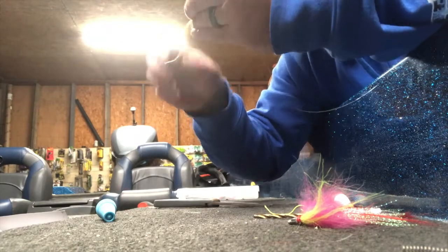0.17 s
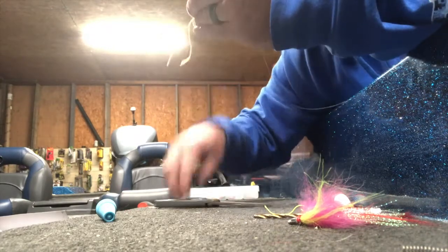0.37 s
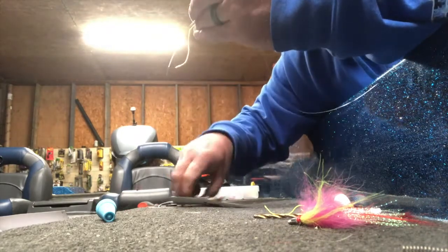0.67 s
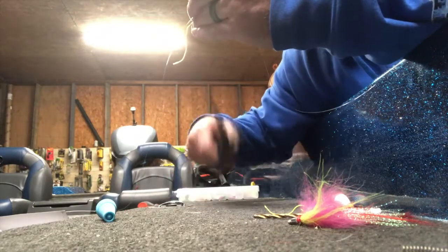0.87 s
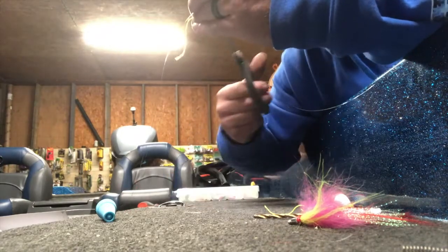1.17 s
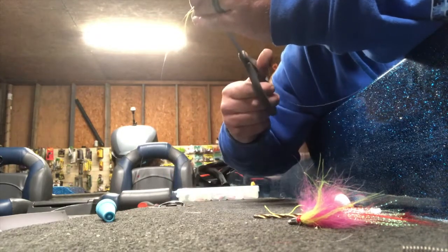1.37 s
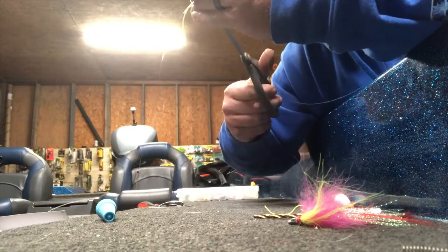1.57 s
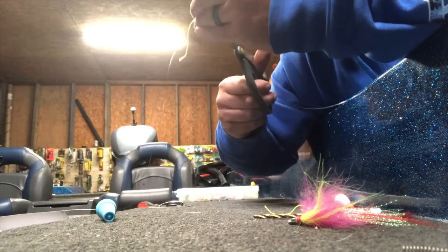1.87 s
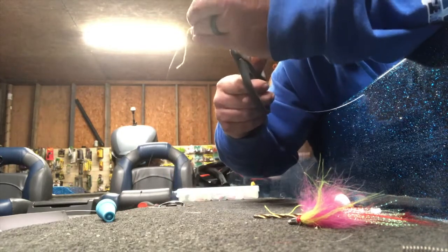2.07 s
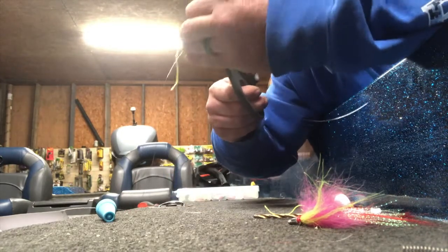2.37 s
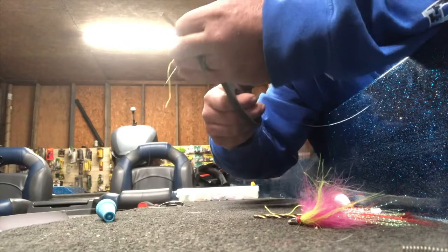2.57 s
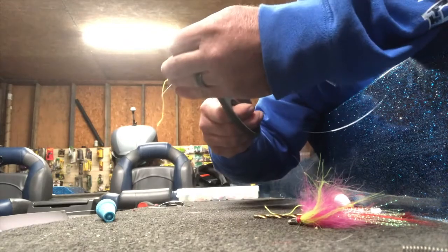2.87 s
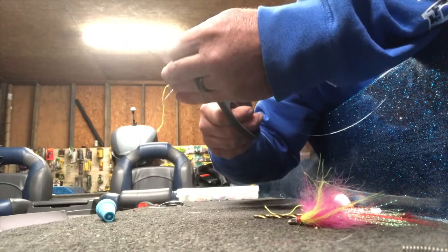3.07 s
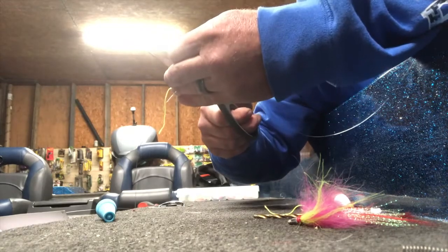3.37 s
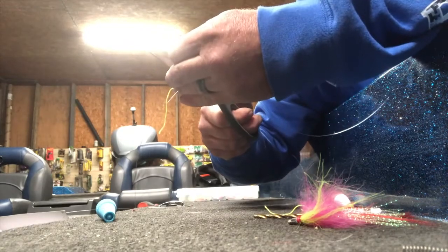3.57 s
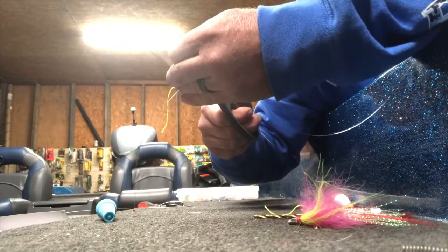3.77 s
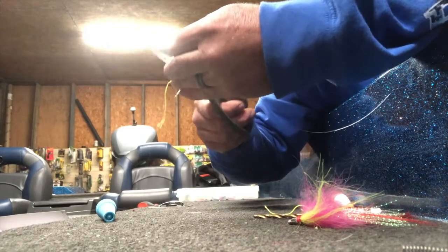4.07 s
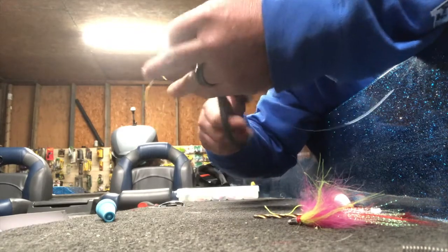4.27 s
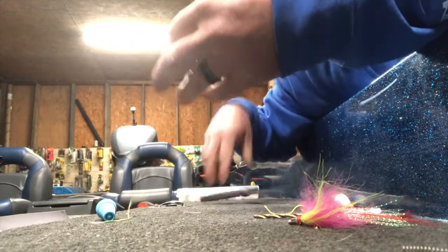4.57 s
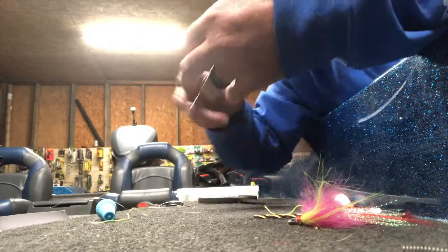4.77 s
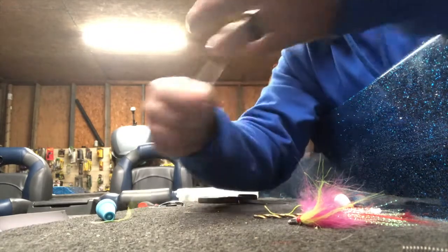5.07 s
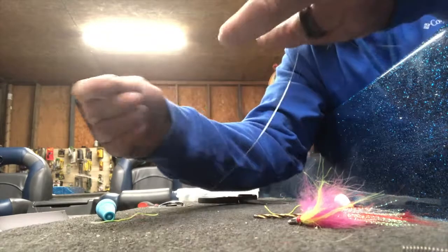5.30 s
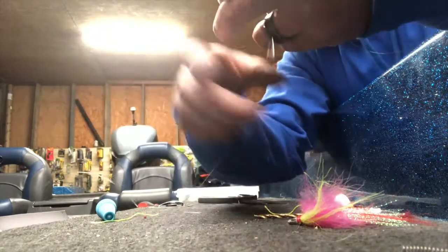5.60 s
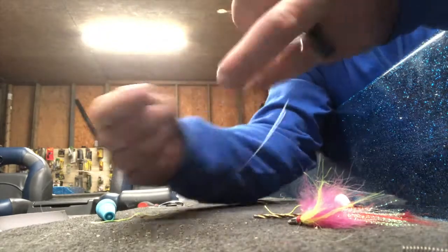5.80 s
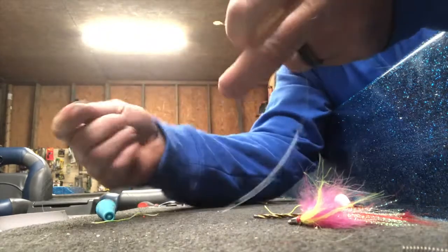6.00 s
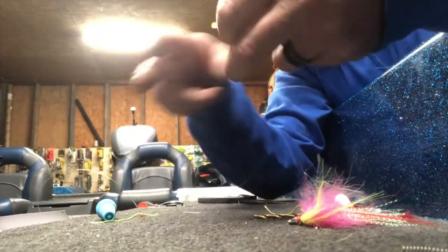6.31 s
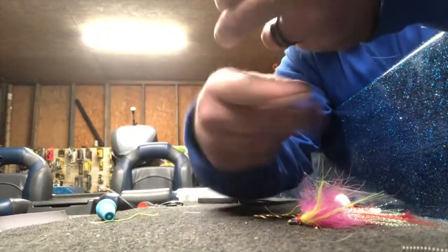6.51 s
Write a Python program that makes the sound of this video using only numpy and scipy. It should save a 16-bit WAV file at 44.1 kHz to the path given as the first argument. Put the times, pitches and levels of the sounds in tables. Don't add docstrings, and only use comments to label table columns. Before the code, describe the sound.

A low, slightly wavering garage hum and soft hiss run throughout, heard from a microphone lying on a carpeted boat deck. At about 0.43 s a hand strikes steel pliers: a hard, dull clack with a woody thump. From 0.5 to 0.7 s they scrape over carpet with a rough rasp and a quickening little rattle, ending in a brighter double clack at 0.72 s and a fading swish. Light sleeve rustles and a thin squeak follow around 1.1 s, then near quiet, with barely audible taps past 3 s. Two tiny crisp snips come at 3.88 and 3.91 s, then a faint falling whisk of line at 4.2 s. At 4.54-4.6 s the pliers drop loudly on a hollow lid, steel jaws chattering, with a softer bounce at 4.7 s and short room echo. Cloth rustle and faint squeaks continue to 6.6 s, with small taps near 5.9 and 6.59 s.

```python
import sys
import numpy as np
from scipy import signal
from scipy.fft import rfft, irfft
from scipy.io import wavfile
from scipy.ndimage import uniform_filter1d

SR = 44100
rng = np.random.default_rng(int(sys.argv[2]) if len(sys.argv) > 2 else 0)


def master_out(mix):
    frames = np.transpose(np.atleast_2d(mix))
    ceiling = np.clip(frames, -1, 1)
    pcm = np.round(ceiling * 32767).astype(np.int16)
    wavfile.write(sys.argv[1], SR, pcm)


def amplitude_ratio(level_db):
    exponent = np.asarray(level_db, float) / 20
    return 10 ** exponent


N = 293160
TIME = np.arange(N) / SR

# (pitch [Hz], level [dB per Hz])
HUM_COLOUR = [(15, -61), (25, -38.5), (35, -14.5), (49, -4.5), (189, 0.5), (285, -1.5), (565, -8),
              (694, -14), (1120, -22), (1500, -27.5), (1950, -55), (3300, -120)]
# (time [s], level [dB])
HUM_LEVEL = [
    [(0., -63.5), (.25, -67), (1., -69), (2.3, -66), (4.5, -67.5), (4.95, -62.5), (6.14, -66.5),
     (6.5, -63.5)],
]
# (pitch [Hz], level [dB per Hz])
HISS_COLOUR = [(500, -29.5), (900, -5.5), (1250, -5), (1500, -11.5), (2700, -12), (5000, -15),
               (7900, -16.5), (8400, -21), (12000, -22.5), (14900, -23), (15050, -47.5), (16500, -60.5)]
# (time [s], cloth rustle [dB])
ARM = [(0., -91), (.38, -86.5), (.96, -78), (1.35, -85), (1.55, -91), (1.85, -82.5), (2.2, -82.5),
       (2.5, -89), (3.4, -86), (4.1, -91), (4.5, -76), (4.85, -72), (5.15, -73), (5.55, -80.5),
       (6.05, -80.5), (6.35, -75.5), (6.5, -81.5)]
# (time [s], cloth rustle [dB], bright fibre hiss [dB])
FLICKS = [(.226, -89, -77), (1.08, -85.5, -71), (1.18, -85, -73), (1.8, -86, -81), (3.46, -74, -89),
          (3.94, -82, -77), (4.2, -74, -75.5), (5.441, -76, -78), (5.78, -79, -86), (5.95, -68, -93),
          (6.1, -82, -85), (6.581, -70, -85)]
# (pitch [Hz], level [dB per Hz])
CLOTH = [(410, -31.5), (700, -2), (1140, -2.5), (1380, -10.5), (1800, -8), (2730, -14.5), (4380, -11.5),
         (5470, -18.5), (15200, -29), (16000, -28.5)]
# (pitch [Hz], level [dB per Hz])
FIBRE = [(4000, -31), (7000, -3.5), (11000, -3), (14000, -4.5), (16000, -13.5)]
# (pitch [Hz], time to fade by 60 dB [s], level [dB])
GARAGE = [(70, .6, -15), (150, 0.6, -7.5), (500, 0.52, -14), (1500, 0.27, -23), (3457, 0.35, -26.5),
          (6000, 0.42, -17.5), (8924, .35, -28), (13140, .3, -22.5)]
# (time [s], length [s], start pitch [Hz], width [Hz], level [dB])
SQUEAKS = [
    (1.101, 0.047, 11000, 1500, -78),
    (1.578, .15, 3740, 248, -82),
    (4.819, 0.49, 4400, 1166, -88.5),
    (4.852, 0.71, 2200, 299, -84),
    (5.082, 0.22, 4100, 800, -80),
    (5.756, 0.071, 2320, 252, -77.5),
    (6.071, 0.16, 2017, 299.5, -82),
    (6.181, 0.071, 4370, 790, -80.5),
    (6.286, 0.1, 1805, 109, -72.5),
]
# (time [s], length [s], level [dB])
WHIPS = [
    (4.174, 0.0093, -72.5),
    (4.199, .016, -70),
    (4.227, .009, -75),
]
# (time [s], level [dB])
DRAG = [
    [(.485, -45), (.53, -56), (.58, -52), (.59, -43.5), (.645, -42.5), (.68, -41.5), (.712, -47.5)],
]
# (pitch [Hz], level [dB per Hz])
CARPET = [(300, -27), (600, -4.5), (950, -5.5), (1230, 4.5), (1500, -6.5), (2400, -10), (3200, -15),
          (3900, -19), (4300, -27.5), (7000, -35.5), (12000, -45), (16000, -50)]
# (pitch [Hz], level [dB per Hz])
PILE = [(500, -25.5), (1000, -3.5), (2000, -7), (2800, -7.5), (3600, -1.5), (5250, -0.5), (5500, -20),
        (9000, -26.5), (14000, -39.5)]
# (pitch [Hz], level [dB], time to fade by 60 dB [s])
DECK = [(47.79, -6.5, .4), (66.74, -5, 0.52), (82, -9.5, 0.29), (100.4, -1, 0.36), (118.46, -0.5, 0.15),
        (151.4, 2, 0.24), (190, 2.5, 0.098), (220, 4, 0.18), (275, -2, 0.2), (322.3, -15, 0.056),
        (415.3, 0, 0.19), (470, -4, 0.036), (501.5, -3.5, 0.084), (568.6, 3.5, 0.0799), (636.2, 4.5, 0.078),
        (740, -3.5, 0.1185), (820, -5, 0.14), (1010, -4, .04), (1328, 0, 0.098)]
# (time [s], peak [dB], brightest pitch [Hz], ring stretch [times])
THUDS = [(.437, -29.5, 694.6, 0.69), (.44, -29, 70, 0.54), (.445, -29, 293.1, 0.66),
         (.455, -29, 169.6, 0.71), (.476, -40.5, 150, 3.4), (.652, -31, 220, 0.82), (.664, -33, 245, 0.47),
         (.67, -39.5, 80.5, 1.), (.727, -27.5, 547.6, 0.8), (.775, -40.5, 391, 0.53),
         (3.144, -53, 750, 0.23), (3.884, -48.5, 600, 0.25), (3.9155, -48, 620, 0.22),
         (4.541, -18.5, 350, 0.34), (4.563, -14.5, 705, 0.88), (4.572, -21, 345, 0.7),
         (4.575, -30.5, 80, 1.4), (4.584, -16.5, 904, 0.15), (4.702, -28, 500, 0.33),
         (4.707, -27.5, 204, 0.29), (4.71, -36, 108, 0.61), (4.72, -31.5, 294, 0.77),
         (5.891, -45, 280, 0.26)]
# (pitch [Hz], level [dB], time to fade by 60 dB [s])
LID = [(280, -4.5, 0.078), (345, -0.5, 0.033), (475, -1, .05), (538, -0.5, 0.055), (740, -2, 0.028),
       (1010, -2.5, 0.016), (1450, 0, .015)]
# (time [s], peak [dB], brightest pitch [Hz], ring stretch [times])
SLAPS = [
    (.6478, -27, 345, 1.),
    (4.564, -23, 280, 0.86),
    (4.5626, -24, 1450, 0.94),
    (4.5628, -16.5, 1010, 1),
    (4.5632, -17, 740, 0.8),
    (4.5645, -12, 534, 0.85),
    (4.7025, -36, 1010, 0.73),
    (4.705, -26.5, 596, 0.38),
    (4.716, -25.5, 500, 0.7),
]
# (pitch [Hz], level [dB], time to fade by 60 dB [s])
JAWS = [(3980, -7, 0.077), (5100, -11, .03), (5814, -3, 0.0904), (6440, -5.5, .06), (7223, -5.5, 0.0632),
        (8680, -10, .1), (9900, -16.5, .04), (10797, -10, .07), (11400, -8.5, .04), (12230, -22.5, .04),
        (14290, 2, .07), (15103, 0, .07), (14775, 0, .06), (16050, -2, .04)]
# (time [s], length [s], level [dB], treble tilt [dB per octave])
GRIPPED = [(0.232, 0.0023, -73.5, 0.5), (.437, .05, -68, 0), (0.717, .05, -66, 5.5),
           (1.025, 0.009, -73, -1.5), (1.184, .005, -70, 6), (1.354, .002, -73, 3),
           (3.143, .0012, -63.5, -0.5), (3.3, .002, -76, -7), (3.8835, .0016, -55, 2),
           (4.197, 0.0032, -64, 6), (4.234, 0.0028, -68, -6), (4.25, .003, -68, 5), (4.348, .003, -71.5, 4),
           (4.5404, .003, -50.5, -1.5), (5.065, 0.008, -75, 4), (5.888, .0012, -65.5, -5),
           (6.13, .012, -79, 10), (3.9095, .004, -68, 4), (3.9132, .0045, -55.5, 3), (3.924, .012, -74, 5)]
# (time [s], length [s], level [dB], treble tilt [dB per octave])
LOOSE = [
    (4.565, 0.023, -34, -4.5),
    (4.585, 0.012, -48.5, -5),
    (4.595, .11, -54, -2.5),
    (4.704, .017, -46, 0.5),
    (4.718, 0.096, -65, -1.5),
]
# (pitch [Hz], level [dB], time to fade by 60 dB [s])
PRESSED_HANDLE = [(740, -25, .03), (1237, -13, 0.023), (1612, -13.5, 0.03), (2050, -0.5, .011),
                  (2200, -0.5, 0.0078), (2500, -6.5, .01), (2743, -8, 0.0099), (3495, -16, 0.00993),
                  (4400, -26, 0.01208), (5000, -23, .01), (6300, -31.5, 0.0088), (7160, -26, .009),
                  (8700, -40.5, 0.0074), (11000, -47.5, 0.0078), (14030, -51, .008)]
# (time [s], peak [dB], brightest pitch [Hz], ring stretch [times])
PRESSED_KNOCKS = [(.4115, -53.5, 2360, 1.165), (.4236, -53.5, 2200, 1.), (.4305, -44.5, 5000, .8),
                  (.4347, -2.5, 2032, 0.87), (.4375, -23.5, 1300, 1.8), (.448, -11.5, 2500, 0.95),
                  (0.452, -22.5, 1600, 3), (.4555, -17.5, 2598, 0.76), (.461, -20.5, 2300, 1.2),
                  (.464, -18.5, 1540, 1), (.475, -27.5, 1694, 0.63), (.4775, -29, 1251, 0.36)]
# (pitch [Hz], level [dB], time to fade by 60 dB [s])
FREE_HANDLE = [(1224, -4, 0.026), (1570, -3.5, .016), (1940, -7, 0.009), (2425, -0.5, .01),
               (2870, -10.5, 0.014), (3570, -7.5, 0.01), (4400, -16.5, .012), (5000, -15.5, 0.012),
               (6500, -24.5, 0.021), (7150, -22, .009), (8826, -33, 0.0097), (10520, -35.5, .008),
               (12500, -42.5, .008), (14400, -42.5, .008)]
# (time [s], peak [dB], brightest pitch [Hz], ring stretch [times])
FREE_KNOCKS = [(0.54, -42, 2500, 0.42), (.563, -51.5, 3000, .8), (.6475, -32.5, 1500, 0.54),
               (.678, -36.5, 2010, 1.), (.7142, -14.5, 2500, 0.84), (.7227, -8, 3330, 0.82),
               (0.724, -7.5, 2090, 0.48), (0.7257, -13, 1390, 0.9), (.737, -34, 2393, 1.3),
               (.744, -36.5, 5000, 1.2), (.772, -34, 2000, 1.), (4.5385, -41, 2500, .6),
               (4.5401, -17, 3600, 0.45), (4.542, -31, 2990, 0.93), (4.5629, -13.5, 1700, 0.52),
               (4.583, -23.5, 1407, 1.2), (4.7019, -40.5, 1500, .8)]
# (time [s], peak [dB], brightest pitch [Hz])
TAPS = [
    (3.365, -62, 1500),
    (3.465, -66, 2500),
    (3.881, -49.5, 2387),
    (3.9142, -49, 5200),
    (3.9142, -54, 2300),
    (5.891, -54.5, 2500),
    (6.115, -63.5, 2402),
    (6.586, -56, 6500),
]


def curve(table):
    seconds, level = np.transpose(table)
    return np.interp(TIME, seconds, level)


def colour(x, points):
    hz, db = np.transpose(points)
    grid = np.fft.rfftfreq(len(x), 1 / SR) + 1
    gain = amplitude_ratio(np.interp(np.log(grid), np.log(hz), db))
    y = irfft(rfft(x) * gain, len(x))
    return y / np.sqrt(np.mean(y ** 2))


def walk(rate):
    hold = int(SR / rate)
    steps = np.repeat(rng.standard_normal(N // hold + 1), hold)
    return 1.3 * uniform_filter1d(uniform_filter1d(steps, hold), hold)[:N]


def add(out, s, x):
    i = int(s * SR)
    out[i:i + len(x)] += x[:len(out) - i]


def band_noise(count, low_hz, high_hz):
    band = signal.butter(2, [low_hz, high_hz], "bandpass", fs=SR, output="sos")
    return signal.sosfilt(band, rng.standard_normal(count))


def grains(rate, spread_db):
    happens = rng.random(N) < rate / SR
    return happens * rng.standard_normal(N) * amplitude_ratio(spread_db * rng.exponential(size=N))


def ring(modes, gains, stretch, rise, detune):
    hz, db, t60 = np.transpose(modes)[:, :, None]
    t = np.arange(int(SR * stretch * t60.max() * 4 / 5)) / SR
    swell = 1 - np.exp(-(t * hz / rise) ** 2)
    fade = amplitude_ratio(db - 60 * t / (t60 * stretch))
    wave = np.sin(2 * np.pi * hz * detune[:, None] * t) * swell * fade
    return gains @ wave


def blows(events, modes, octaves, rise, scatter_db, spread):
    out, hz = np.zeros(N), np.array(modes)[:, 0]
    chance = rng.standard_normal((len(events), 3, len(modes)))
    for (s, db, bright_hz, stretch), (size, sign, shift) in zip(events, chance):
        distance = np.abs(np.log2(hz / bright_hz)) / octaves
        gains = amplitude_ratio(-6 * distance + scatter_db * size) * np.sign(sign)
        hit = ring(modes, gains, max(stretch, .1), rise, 1 + spread * shift)
        add(out, s, hit * amplitude_ratio(db) / np.abs(hit).max())
    return out


def hiss():
    return colour(rng.standard_normal(N), HISS_COLOUR) * amplitude_ratio(-77)


def hum():
    total = 0
    for hz in 30 * 2 ** np.arange(0, 6, .5):
        band = band_noise(N, hz / 2 ** 0.29, hz * 2 ** .25)
        total = total + band * amplitude_ratio(1.5 * walk(5.5))
    return colour(total, HUM_COLOUR) * amplitude_ratio(curve(HUM_LEVEL[0]) + 1.5)


def flicks(column):
    out, age = np.zeros(N), np.arange(SR // 2) / SR
    rise_s, fade_s = 0.014, 0.044
    shape = np.minimum(age / rise_s, 1) * np.exp(-age / fade_s)
    for row in FLICKS:
        add(out, row[0], amplitude_ratio(row[column]) * shape)
    return out


def sleeves():
    arm_db = curve(ARM)
    cloth = colour(grains(8000, 1.68), CLOTH)
    cloth *= np.hypot(amplitude_ratio(arm_db), flicks(1)) * amplitude_ratio(2.5 + 1.9 * walk(14))
    fibre_db = -92 + .4 * (arm_db + 85)
    fibre = colour(grains(9000, 1.5), FIBRE)
    fibre *= np.hypot(amplitude_ratio(fibre_db), flicks(2)) * amplitude_ratio(-0.5 + 2.5 * walk(30))
    return cloth + fibre


def garage(x, gap_s=0.0034):
    t, tail = np.arange(SR) / SR, 0
    borders = [np.sqrt(a[0] * b[0]) for a, b in zip(GARAGE, GARAGE[1:])]
    edges = [40] + borders + [16000]
    for (_, t60, db), low, high in zip(GARAGE, edges, edges[1:]):
        fade = amplitude_ratio(db - 60 * t / t60) / np.sqrt(t60 * SR / 14)
        tail = tail + band_noise(SR, low, high) * fade
    return signal.fftconvolve(x, tail * np.clip(t / gap_s - 1, 0, 1))[:N]


def sliding_tone(length, start_hz, width_hz, db, sag):
    count, smooth = int(length * SR), int(SR / width_hz / 2)
    noise = rng.standard_normal((2, SR))
    slow = uniform_filter1d(uniform_filter1d(noise, smooth), smooth)[:, :count]
    hz = start_hz * 2 ** (-sag * np.arange(count) / SR)
    turn = 2 * np.pi * np.cumsum(hz) / SR
    tone = slow[0] * np.cos(turn) + slow[1] * np.sin(turn)
    return tone / tone.std() * np.hanning(count) ** .5 * amplitude_ratio(db)


def squeaks():
    out = np.zeros(N)
    for s, length, start_hz, width_hz, db in SQUEAKS:
        add(out, s, sliding_tone(length, start_hz, width_hz, db, sag=.15))
    return out


def whips():
    out, sag = np.zeros(N), 14.5
    for s, length, db in WHIPS:
        start_hz = 12680 * 2 ** (-sag * (s - WHIPS[0][0]))
        add(out, s, sliding_tone(length, start_hz, 150, db, sag))
    return out


def drag():
    start, end = DRAG[0][0][0], DRAG[0][-1][0]
    during = np.clip(np.minimum(TIME - start, end - TIME) / .01 + 1, 0, 1)
    rasp = colour(grains(7000, 2.2), CARPET) * during
    rasp *= amplitude_ratio(curve(DRAG[0]) + 1.4 * walk(90))
    age = TIME - .735
    swish = colour(grains(15070, 1.162), PILE) * amplitude_ratio(-48 - 155 * age)
    return rasp + swish * np.clip(age / .01 + 1, 0, 1)


def deck():
    boards = np.repeat(DECK, 2, axis=0)
    return blows(THUDS, boards, octaves=0.7, rise=.8, scatter_db=2.0, spread=0.065)


def lid():
    return blows(SLAPS, LID, octaves=.2, rise=1.7, scatter_db=.5, spread=.004)


def jaws():
    out, modes = np.zeros(N), np.repeat(JAWS, 5, axis=0)
    cluster = .025 * np.tile(np.linspace(-1, 1, 5), len(JAWS))
    split = 1 + cluster + .003 * rng.standard_normal(len(modes))
    lead = 64
    gripped = [(*k, -19.5) for k in GRIPPED]
    loose = [(*k, -2.5) for k in LOOSE]
    for s, length, db, tilt_db, ring_db in gripped + loose:
        count = int(length * SR) + 2
        k = np.arange(count)
        noise, dice = rng.standard_normal(8192)[:count], rng.random(8192)[:count]
        contacts = noise * (dice < .3) * np.sin(np.pi * k / count) ** .3
        contacts *= amplitude_ratio(-230 * k / SR)
        size, sign = rng.standard_normal((2, len(modes)))
        body = ring(modes, np.sign(sign) * amplitude_ratio(-35 + ring_db + 3.3 * size), 0.84, 0.91, split)
        body[0] += 1
        burst = signal.fftconvolve(contacts, np.pad(body, (lead, 0)))
        burst = colour(burst, [(500, -27.5), (2000, -2 * tilt_db), (16000, tilt_db)])
        loudness = np.sqrt(np.mean(burst[lead:lead + count] ** 2))
        add(out, s - lead / SR, burst * amplitude_ratio(db) / loudness)
    return out


def rattle():
    k = np.arange(6)
    times = .587 + 0.008 * np.cumsum(0.73 ** k * (k > 0))
    levels = -30 - 0.8 * k - 8 * (k == 0)
    return [(s, db, 1352, 1.9) for s, db in zip(times, levels)]


def pressed_handles():
    return blows(PRESSED_KNOCKS, PRESSED_HANDLE, octaves=2.3, rise=1.8, scatter_db=4.0, spread=0.013)


def free_handles():
    taps = [(*k, 0.43) for k in TAPS]
    events = sorted(FREE_KNOCKS + rattle() + taps)
    return blows(events, FREE_HANDLE, octaves=.8, rise=1.2, scatter_db=1.06, spread=.025)


def scene():
    near = pressed_handles() + free_handles() + deck() + lid()
    near = near + jaws() + drag() + squeaks() + whips()
    echoes = garage(near)
    background = sleeves() + hum() + hiss()
    return (near + echoes + background)[None]


def band_limit(x):
    return signal.sosfilt(signal.butter(12, 16450, fs=SR, output="sos"), x)


def record(dry):
    rumble_cut = signal.butter(2, 45, "highpass", fs=SR, output="sos")
    top_cut = signal.ellip(8, .2, 60, 15950, fs=SR, output="sos")
    mix = signal.sosfilt(top_cut, signal.sosfilt(rumble_cut, dry))
    return band_limit(mix)


dry = scene()
out = record(dry)
master_out(out)
```